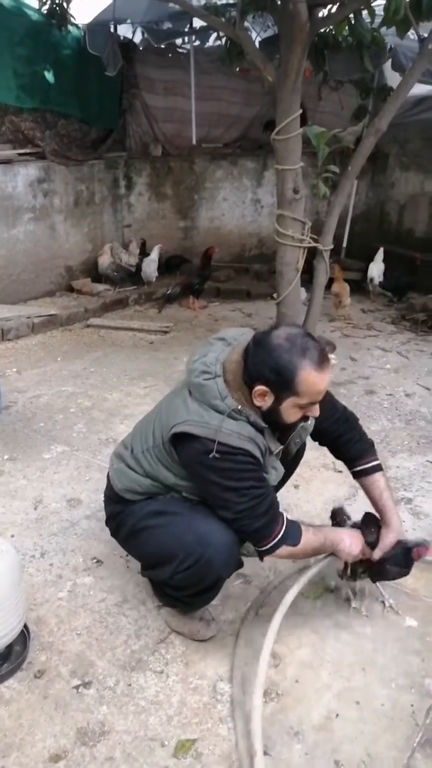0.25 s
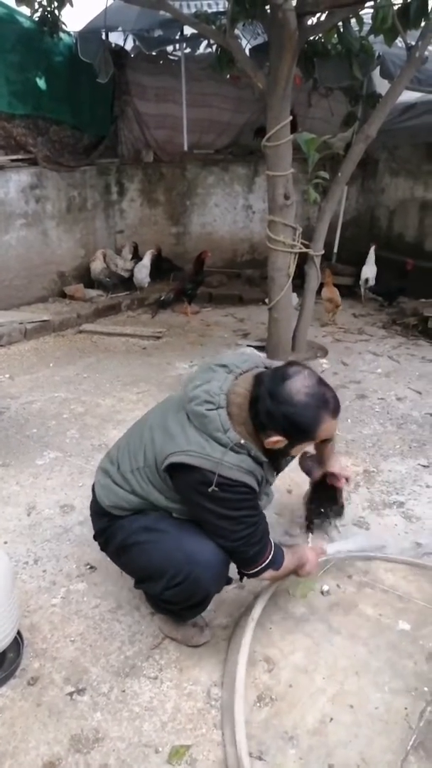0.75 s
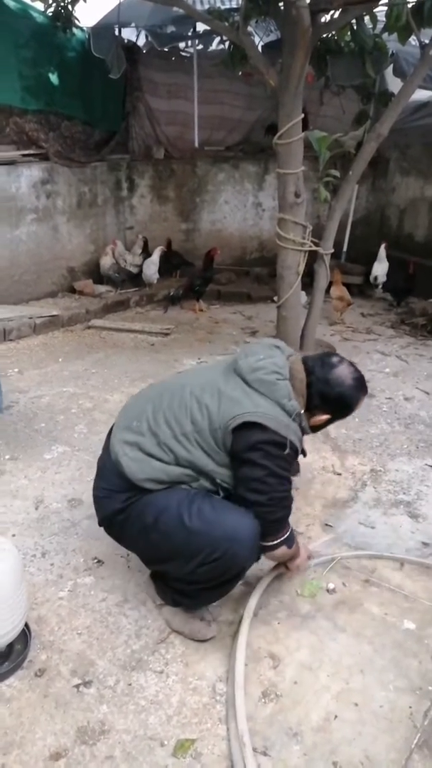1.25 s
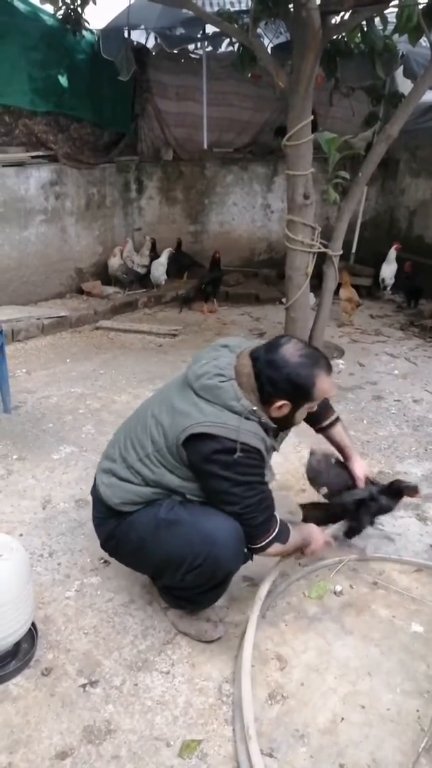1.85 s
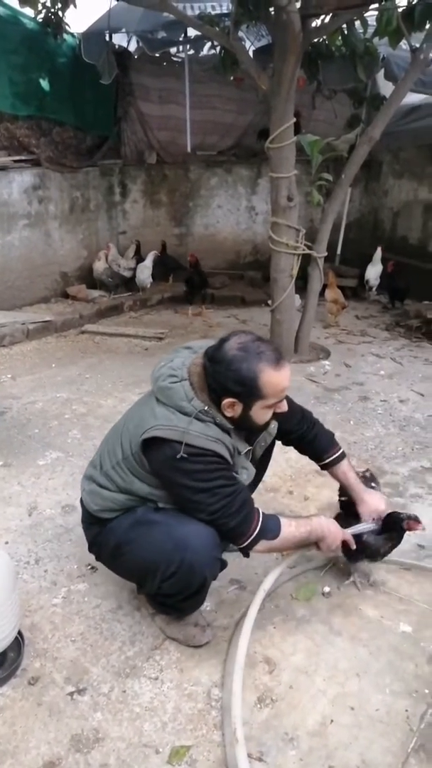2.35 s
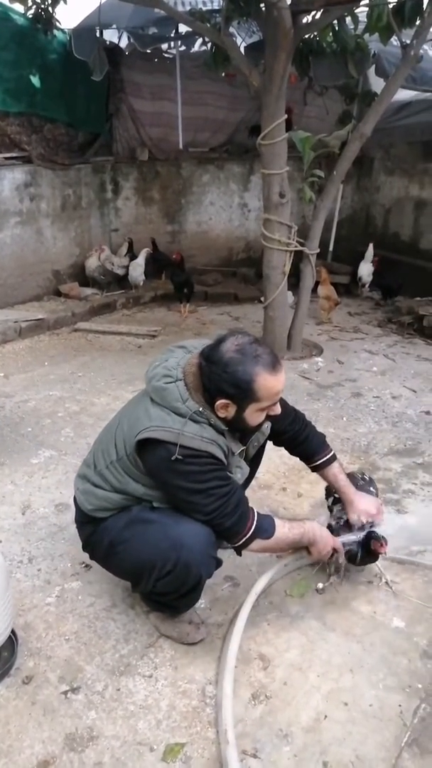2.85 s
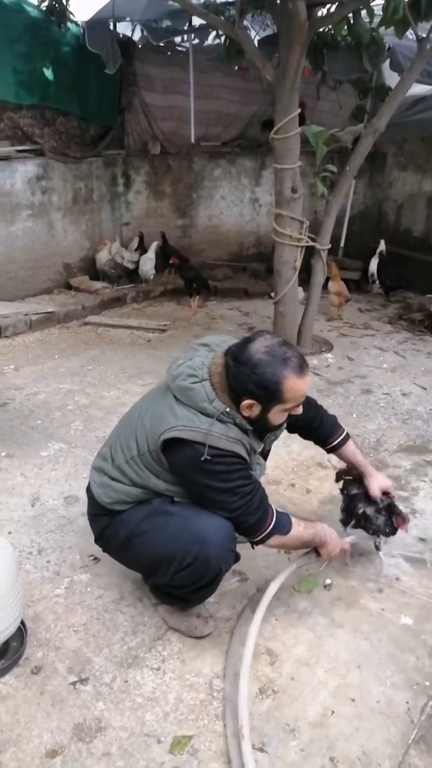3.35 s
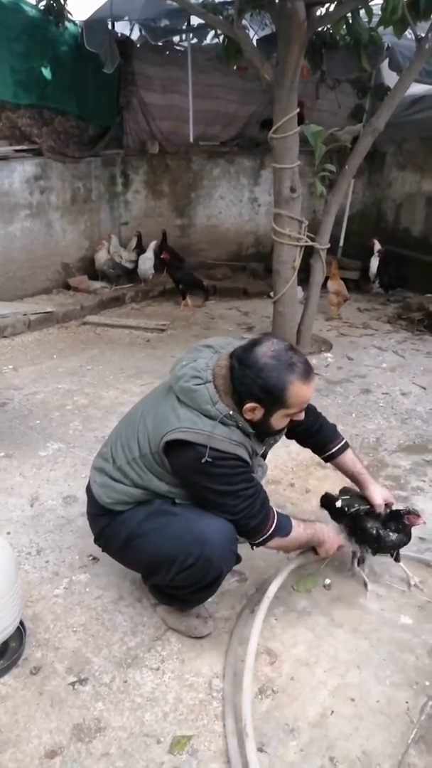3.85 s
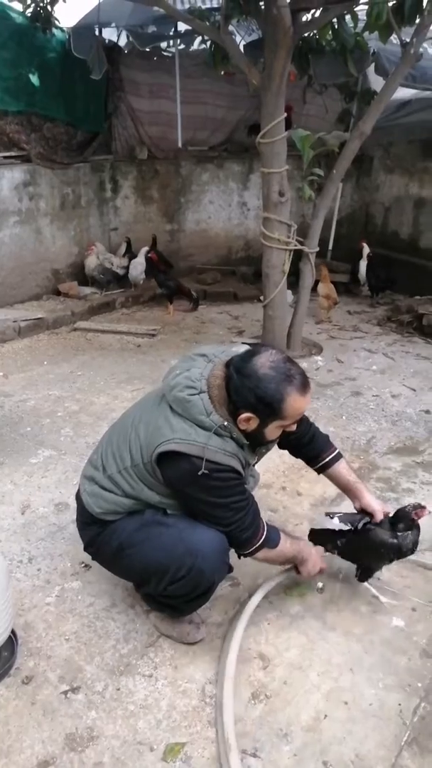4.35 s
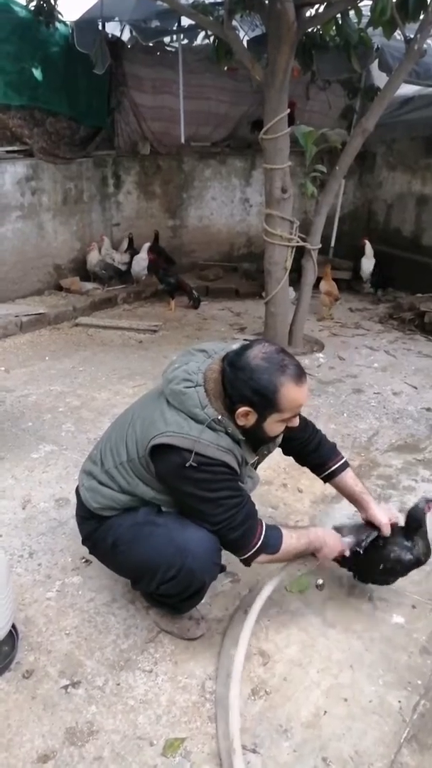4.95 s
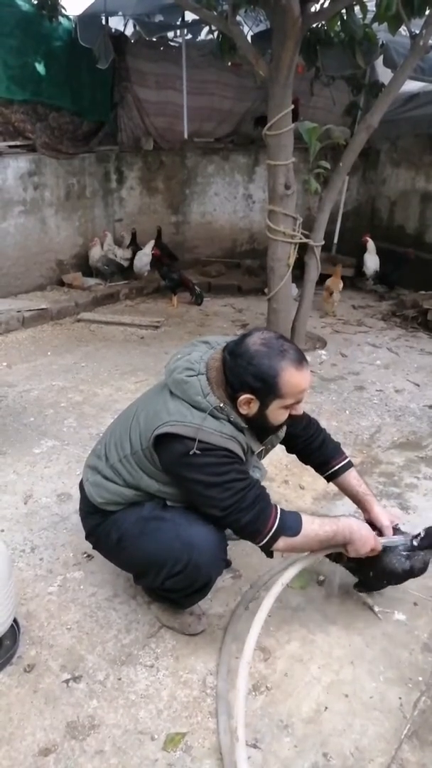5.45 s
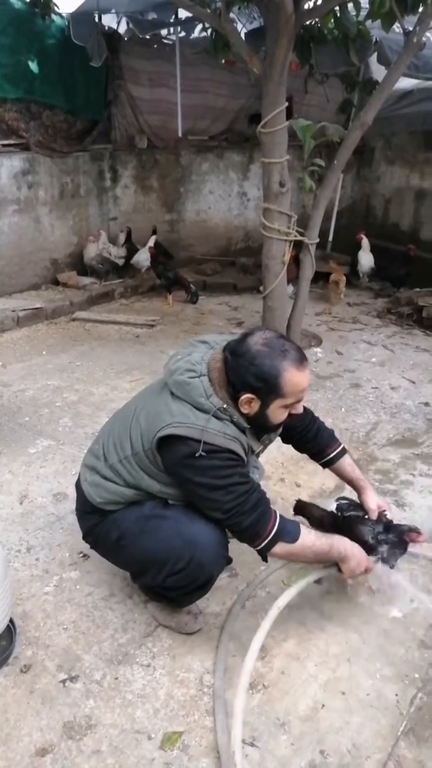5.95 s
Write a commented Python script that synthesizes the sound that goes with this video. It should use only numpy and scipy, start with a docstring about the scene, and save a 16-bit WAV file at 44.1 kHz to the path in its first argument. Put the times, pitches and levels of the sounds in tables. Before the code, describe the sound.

A close stereo pickup of a hen being hosed: quick clucks, then fluttering hoarse squawks, a run of low clucks, a long rising squawk just after three seconds, another after four, then clipped clucks and a final short cry. Water crackles and sprays throughout, with splashy bursts and gaps. A small bird chirps far off and a motor drones very softly in the reverberant yard.

```python
"""A walled concrete yard: close to a stereo microphone, a hen is held and washed with a garden hose.
She protests in short clucks and long, rough, fluttering squawks: pulses and breath through moving resonances.
The jet hisses on her feathers and spatters on the ground: hails of tiny impacts over coloured noise.
A far small bird chirps in warbling sine sweeps, a far motor drones in wavering sines over low rumble."""
import sys
import numpy as np
from scipy import signal
from scipy.fft import rfft, irfft, next_fast_len
from scipy.io import wavfile
from scipy.ndimage import uniform_filter1d

SR = 44100
rng = np.random.default_rng(int(sys.argv[2]) if len(sys.argv) > 2 else 0)


def wrap_up_sound(samples):
    """Save the sound to the file named by the first command line argument, as 16-bit audio."""
    columns = np.atleast_2d(samples).T
    # keep every value between -1 and 1, then stretch to whole-number steps
    tamed = np.clip(columns, -1, 1)
    steps = np.round(tamed * 32767).astype(np.int16)
    wavfile.write(sys.argv[1], SR, steps)


N = 273861
TIME = np.arange(N) / SR

# All levels in the tables are relative: the functions add their own trims.
# Long squawks; rows overlap where the voice splits or changes register. Pitch to chest are values at the climax:
# start_s, climax_s, end_s, level_db, pitch_hz, roughness (0-1), throat_hz, throat_width_hz,
# beak_opening_db, beak_speed_db_per_s, beak_hz, beak_width_hz, chest_db, chest_hz, rasp_db,
# overtone_db (8 kHz, against the rasp), edge_db (3 kHz), beats_per_s, throb_db, pitch_sag_hz_per_s
SQUAWKS = [ (0.619, 0.745, 0.826, -27.5, 688, 0.81, 1490, 1060, -6, 56, 2620, 487, -8, 800, -16.5, -3.5, -23, 48, 5, 290),
           (1.193, 1.315, 1.368, -33.5, 1052, 0.3, 1210, 660, 2.5, 65, 2300, 1080, -12, 730, 0.5, -39, -4, 55, 2.5, 107),
           (1.212, 1.285, 1.35, -38, 703, 0.46, 1700, 900, -1.5, 60, 2630, 600, -10, 690, -2, -32, -11, 49, -1, 98),
           (1.335, 1.363, 1.43, -35, 699.5, 0.95, 1220, 1000, 0.5, 89, 2320, 1290, -2, 686, 2.5, -26, -16, 46, 0.5, 610),
           (1.424, 1.495, 1.605, -35.5, 590, 0.81, 1120, 560, -8, 62, 2335, 500, -8.5, 665, -34, -30, -36, 42.7, 4, 200),
           (2.047, 2.168, 2.203, -33.5, 580, 1.01, 1120, 800, -11, 63, 2570, 800, -9, 630, -17, -26, -15.5, 53.4, 11.5, 310),
           (2.194, 2.229, 2.395, -31.5, 558.8, 0.6, 1100, 497, -17, 90, 2370, 710, -10.5, 684, -15, -18, -19, 49, 7.5, 599.5),
           (3.004, 3.347, 3.385, -29.5, 612.7, .7, 1196, 720, -2.5, 94, 2330, 670, -6.5, 616, -20.5, -0.5, -22, 47.5, 5.5, 100),
           (3.372, 3.409, 3.465, -27.5, 649.3, .85, 1250, 545, -8, 88, 2380, 950, -17, 635, -22.5, -2, -15, 49, 2.5, 306),
           (4.325, 4.479, 4.645, -29.5, 579, 0.7, 1240, 490, -12.5, 32, 2318, 410, -7, 710, -25, -59, -29, 44.8, 4.5, 57),
           (4.779, 4.811, 4.852, -30.5, 683, 0.9, 1290, 700, -8.5, 128, 2150, 750, -6.5, 760, -25, -3, -28, 66, 2, 295),
           (6.083, 6.146, 6.240, -31.5, 685.7, 0.79, 1210, 500, -4.5, 18, 2296, 710, -8, 735, -35, 3, -22, 48.6, 4, 0)]
# Clucks; the pitches are the ends of the straight glide under the arch:
# start_s, length_s, first_pitch_hz, last_pitch_hz, level_db, roughness (0-1), throat_hz,
# beak_opening_db, beak_hz, rasp_db
CLUCKS = [ (0.093, 0.059, 581, 680, -28, 0.07, 1240, -37, 1900, -40),
          (0.114, 0.031, 678, 610, -35, 0.45, 1040, -2, 1990, -30),
          (0.148, 0.022, 648, 470, -32.5, 0.36, 1070, -21, 1900, -30),
          (0.155, 0.026, 770, 720, -38.5, 0.7, 960, -2, 2040, -25),
          (0.176, 0.02, 640, 576, -27.5, 0.41, 1200, -7.5, 2280, -23),
          (0.183, 0.039, 653, 582, -35.5, 0.64, 1070, -17, 1930, -31),
          (0.581, 0.022, 560, 635, -41, 0.45, 1150, -10, 1800, 0.5),
          (0.607, 0.018, 763, 750, -25.5, 0.42, 1620, -22, 2000, -13),
          (0.852, 0.036, 812, 706, -29, 0.49, 1180, -0.5, 2570, -14),
          (0.873, 0.039, 1011, 854, -40.5, 0.44, 950, 12, 1870, -33),
          (1.588, 0.05, 429.7, 482, -29.5, 0.66, 1050, -1, 2370, -11.5),
          (1.653, 0.068, 571, 585, -39, 0.7, 885, -2, 2120, -6),
          (1.705, 0.049, 563, 505.5, -26, 0.6, 1080, -3.5, 2190, -13.5),
          (1.767, 0.12, 601, 566, -44, 0.75, 1010, -7.5, 2190, -25),
          (1.871, 0.058, 494, 555, -24.5, 0.56, 900, -4.5, 2170, -15),
          (2.005, 0.036, 603, 568.4, -28, 0.56, 1130, 2.5, 2310, -6.5),
          (2.329, 0.029, 460.6, 432, -33, 0.48, 1030, -1, 2380, -25),
          (2.815, 0.086, 786, 706, -42.5, 0.57, 680, -16, 1900, -39),
          (2.98, 0.06, 719, 613, -43.5, 0.47, 990, -33, 1900, -28),
          (3.438, 0.02, 675, 624, -28, 0.65, 1300, -24, 2260, -40),
          (3.739, 0.036, 662, 490, -41, 0.4, 586, -13, 2340, -16),
          (4.14, 0.049, 587, 533, -29, 0.19, 1136, -27, 2410, -47),
          (4.168, 0.026, 538, 433, -28, 0.31, 960, -22, 2320, -40),
          (4.242, 0.028, 472, 548, -30, 0.25, 960, -12.5, 1930, -23.5),
          (4.3, 0.028, 512, 543, -30.5, 0.58, 1010, -13, 2400, -25),
          (4.664, 0.035, 579, 555, -31.5, 0.48, 1180, -4, 2120, -37),
          (4.72, 0.031, 641, 765, -37, 0.54, 870, -6, 2100, -30),
          (4.735, 0.033, 690, 621, -30, 0.67, 1190, 0.5, 2350, -32),
          (4.853, 0.026, 673, 594, -26, 0.43, 1013, -4.5, 2050, -16),
          (4.956, 0.02, 550, 620, -35, 0.1, 1150, -22, 2170, -40),
          (4.965, 0.0377, 655.7, 598, -24.5, 0.68, 1160, -12, 2230, -35),
          (4.995, 0.041, 636.4, 514, -30.5, 0.54, 1090, -12.5, 2150, -37),
          (5.033, 0.024, 610, 520, -51, 0.4, 1010, -17, 2100, -21),
          (5.439, 0.045, 542, 561, -26, 0.22, 1080, -29, 2300, -48),
          (5.47, 0.019, 495, 380, -30, .25, 947, -22, 1720, -40),
          (5.489, 0.019, 514, 542, -26.5, 0.47, 1017, -20, 2050, -45),
          (5.925, 0.035, 477, 587, -39.5, 0.37, 1060, -11, 2080, -35),
          (5.934, 0.061, 696, 650, -37, 0.18, 1150, -2, 2420, -31),
          (5.958, 0.039, 687, 498, -31.5, 0.25, 1140, -9.5, 2200, -30),
          (6.059, 0.036, 582, 662, -35, 0.2, 1230, -6, 2330, -25),
          (6.068, 0.027, 587, 406, -35, 0.5, 1000, -9, 2330, -28)]
# Upper resonances of a squawk, in order edge, rasp and overtone: centre_hz, width_hz
UPPER_RESONANCES = [(3300, 470), (5250, 1930), (8100, 1800)]
# Left-right balance of the close sounds, shifting over time: time_s, left_minus_right_db
BALANCE = [(0, -5.5), (1.1, 0), (1.85, -1), (2.05, 5.5), (2.4, 5.5), (3.3, -3.5), (4.7, -4.5), (5.5, -7),
           (6.2, -2.5)]

# Strength of the jet, as the level of its fine spray: time_s, level_db
JET = [(0.0, -58), (0.25, -57), (0.64, -53), (1.42, -67), (1.55, -51), (1.68, -55), (1.97, -70),
       (2.13, -50), (2.39, -61), (3.41, -52.5), (3.56, -49), (3.87, -53), (4.12, -57), (4.62, -63.5),
       (5.21, -54.5), (5.34, -44), (5.38, -65), (5.58, -61), (5.66, -48), (5.88, -56), (6.21, -56)]
# How hard water spatters on the ground as the hen is moved through the jet: time_s, level_db
SPATTERING = [(0, -37.5), (0.25, -39), (0.31, -41), (0.55, -40.5), (1.03, -43.5), (1.5, -43.5),
              (1.83, -48.5), (2.15, -43.5), (2.4, -47.5), (2.47, -42.5), (2.95, -42.5), (3.6, -40.5),
              (3.85, -43.5), (3.98, -39), (4.15, -49), (4.32, -42.5), (4.65, -48), (4.95, -46.5),
              (5.2, -42), (5.34, -41), (5.4, -52.5), (5.66, -40.5), (5.85, -45), (6.21, -45.5)]
# The jet slaps on feathers or concrete: start_s, length_s, spatter_db, fine_spray_db
SLAPS = [(0.126, 0.12, -33, -47), (0.415, 0.13, -36, -86), (1.063, 0.17, -35.5, -52.5),
         (1.984, 0.08, -35.5, -51), (2.424, 0.02, -36.5, -72), (2.516, 0.15, -37, -49),
         (2.714, 0.19, -41, -85), (4.698, 0.097, -41, -50), (5.239, 0.1, -37, -58),
         (5.696, 0.088, -40, -43.5), (5.917, 0.2, -33.5, -44.5)]
# Colour of the spatter on the ground: frequency_hz, gain_db
SPATTER_COLOUR = [(700, -55), (1300, -26), (2300, -4.5), (3000, -6), (4200, -11.5), (5300, 4.5), (6100, 4),
                  (7700, -7.5), (10500, -26), (14000, -15)]
# Colour of the fine spray: frequency_hz, gain_db
SPRAY_COLOUR = [(7000, -4), (9500, 8.5), (11000, 3), (12500, 6.5), (13800, -20), (15000, 13), (16000, -44)]
# Watery gushes, hoarse rasps of the hen, a low thud: start_s, length_s, centre_hz, width_hz, level_db
NOISE_SWELLS = [(0.595, 0.031, 5370, 600, -36), (0.954, 0.041, 265, 200, -50.5),
                (1.016, 0.53, 1770, 1430, -39), (2.498, 0.087, 1520, 830, -43),
                (3.943, 0.36, 660, 440, -48.5), (4.073, 0.016, 472, 204, -40),
                (4.405, 0.18, 4250, 888, -54.5), (4.803, 0.078, 4500, 1510, -42.5),
                (5.289, 0.066, 3850, 2470, -48.5), (5.62, 0.058, 2140, 503, -52),
                (6.013, 0.027, 2520, 800, -40.5)]
# Sharp ticks, most like drops on concrete: start_s, peak_db
TICKS = [(0.1605, -36), (0.9475, -25.5), (2.4319, -36), (2.623, -33), (3.647, -38), (5.079, -42),
         (5.268, -34), (5.428, -38), (5.671, -34), (5.838, -42)]

# Chirps and thin whistles of a far small bird: start_s, length_s, first_hz, last_hz, level_db
CHIRPS = [(0.038, 0.036, 3220, 3440, -39.5), (0.047, 0.064, 4240, 5300, -35),
          (2.798, 0.05, 2770, 3680, -43), (2.817, 0.066, 4060, 4800, -44.5),
          (4.18, 0.14, 2470, 2536, -48.5), (4.777, 0.025, 2940, 3840, -39.5),
          (4.785, 0.051, 5280, 5010, -35)]
# Far motor on its higher note: time_s, pitch_hz, level_db
HIGH_HUM = [(0.0, 131.2, -54), (0.29, 149.7, -51), (0.901, 153.6, -55.5), (1.01, 130, -51.5),
            (1.99, 134.8, -45), (2.3, 126.5, -61)]
# Far motor later, on its lower note: time_s, pitch_hz, level_db
LOW_HUM = [(3.7, 100, -75), (3.92, 103, -50), (4.278, 97.7, -43.5), (4.36, 100.3, -55), (5.9, 99.4, -50.5),
           (6.21, 103.5, -60)]
# Colour of the outdoor rumble: frequency_hz, gain_db
RUMBLE_COLOUR = [(20, -12), (45, -2), (90, -0.5), (155, 0), (220, -7.5), (400, -7), (700, -10),
                 (1500, -16.5), (3000, -25)]
# Left-right likeness of diffuse sound: frequency_hz, likeness (0-1)
LIKENESS = [(60, 1), (240, 0.99), (480, 0.81), (950, 0.42), (1900, 0.007), (15000, 0.017)]
# Balance of the two microphone ports: frequency_hz, left_minus_right_db
PORTS = [(100, -2), (700, -2), (1300, 0), (2300, -8.5), (3300, -8), (4400, -4.5), (5600, -18.5), (7000, -8),
         (8500, 0), (10500, -3.5), (12500, -11.5), (15000, -16)]

# Squawks: change on either side of the climax
SWELL_DB_PER_S, EBB_DB_PER_S = 13.5, 23
RASP_RISE_DB_PER_S, RASP_FALL_DB_PER_S = 77, 124
RISE_HZ_PER_S = 120
ROUGH_LOSS_PER_S = 0.24   # the voice is clearer away from the climax
SQUAWK_ATTACK_S, SQUAWK_RELEASE_S = 0.0058, 0.0091
FLUTTER = .12   # share by which the pitch swings with each beat, at full roughness
AIRWAY_FLEX = .08   # share by which the resonances swing with each beat, at full roughness
# Clucks
CLUCK_BEATS_PER_S = 165   # a rattle
THROB_DB = 5.5   # swing of the level with each beat, at full roughness
VOICE_LOW_HZ = 400   # the hen's body radiates little below this
SLAP_PEAK_SHARE = 0.47   # a slap is loudest at this share of its length, then drains away
RUMBLE_DB = -50.5
YARD_T60_S, RIGHT_LEAD_S = 0.35, 0.00015
CUTOFF_HZ = 15850


def hen():
    """Squawks and clucks, rolled off in the bass because a small body radiates little there."""
    high_pass = signal.butter(4, VOICE_LOW_HZ, "high", fs=SR, output="sos")
    return signal.sosfilt(high_pass, squawks() + clucks() + 1e-18)


def squawks(body_db=-3.04, throat_db=-5.5, beak_db=6, chest_width_hz=380, leak_db=-13, hoarse_db=-20,
            closed_ratio=0.85, half_open_db=-9):
    """Long rough cries; towards the climax the beak opens, so that its resonance grows and climbs."""
    out = np.zeros(N)
    for (start, climax, end, level_db, pitch_hz, rough, throat_hz, throat_width, open_db, beak_speed,
         beak_hz, beak_width, chest_db, chest_hz, rasp_db, overtone_db, edge_db, beats_per_s, throb_db,
         sag_hz_per_s) in SQUAWKS:
        t = np.arange(start, end, 1 / SR)
        before, after = np.maximum(climax - t, 0), np.maximum(t - climax, 0)
        level = level_db - SWELL_DB_PER_S * before - EBB_DB_PER_S * after
        opening = open_db - beak_speed * (before + after)
        strain = -RASP_RISE_DB_PER_S * before - RASP_FALL_DB_PER_S * after
        pitch = pitch_hz - RISE_HZ_PER_S * before - sag_hz_per_s * after
        roughness = np.clip(rough - ROUGH_LOSS_PER_S * (before + after), 0, 1)

        swell, glide = flutter(t - climax, beats_per_s)
        breath = .45 - .25 * np.tanh(swell)   # clearest at the top of a beat
        source = syrinx(pitch, roughness, glide, air=breath)

        flex = 1 + AIRWAY_FLEX * roughness * glide   # the airway moves with every beat
        bend = flex * pitch / pitch_hz
        # the chest carries the fundamental
        chest = resonance(source, chest_hz * bend, chest_width_hz, 1.35 * roughness)
        throat = resonance(source, throat_hz * bend, throat_width, roughness / 2)
        edge, rasp, overtone = [resonance(source, hz, width, roughness) for hz, width in UPPER_RESONANCES]
        wide = 1 / (1 + from_db(2 * (half_open_db - opening)))   # 0 closed, 1 wide open
        beak_centre = beak_hz * flex * (closed_ratio + (1 - closed_ratio) * wide)
        beak = resonance(source, beak_centre, beak_width, roughness / 2)
        # turbulence between the resonances
        turbulence = roughness * resonance(rng.standard_normal(len(t)), 1930, 2270, roughness)

        cry = from_db(throat_db) * throat + from_db(opening + beak_db) * beak
        raspy = from_db(rasp_db) * (rasp + from_db(overtone_db) * overtone)
        cry += from_db(strain) * (from_db(edge_db) * edge + raspy)
        cry = cry * from_db(throb_db * np.tanh(swell))
        cry += from_db(chest_db + body_db) * chest
        cry += (from_db(hoarse_db) + from_db(opening + beak_db + leak_db)) * turbulence
        envelope = gate(t, start, end, SQUAWK_ATTACK_S, SQUAWK_RELEASE_S)
        add(out, start, cry * from_db(level) * envelope)
    return out


def clucks(throat_width_hz=560, beak_width_hz=850, gain_db=0.22, leak_db=-13, chest_db=-7,
           airway_follows=0.24):
    """Short arched notes that swell and fade smoothly; throat and beak resonances bend with the pitch."""
    out = np.zeros(N)
    for (start, length, first_hz, last_hz, level_db, rough, throat_hz,
         opening_db, beak_hz, rasp_db) in CLUCKS:
        size, rough = int(length * SR), np.clip(rough, 0, 1)
        # air pressure lifts loudness and pitch together
        swell = np.sin(np.pi * np.linspace(0, 1, size) ** .9)
        pitch = np.linspace(first_hz, last_hz, size) * (1 + .11 * (swell - swell.mean()))
        bend = (pitch / pitch.mean()) ** airway_follows
        beat = beats(CLUCK_BEATS_PER_S, size)
        source = syrinx(pitch, rough * (1 + swell) / 2, beat, air=.4)

        # a clean note has a narrow throat
        note = resonance(source, throat_hz * bend, throat_width_hz * (0.28 + 2 * rough))
        note += from_db(chest_db + 0.77 * opening_db) * resonance(source, pitch, 290)
        beak = resonance(source, beak_hz * bend, beak_width_hz)
        leak = from_db(leak_db) * resonance(source, 3010, 1810)
        note += swell * from_db(opening_db + 1.5) * (beak + leak)
        note += swell * from_db(rasp_db - 2.5) * resonance(source, 5700 * bend, 2700)
        throb = THROB_DB * rough * np.tanh(beat)
        add(out, start, from_db(level_db + gain_db + throb) * note * swell ** 1.4)
    return out


def syrinx(pitch, rough, beat, air=1.0):
    """Membrane pulses swing in pitch with the beat; roughness adds wander, period doubling and air puffs."""
    size = len(pitch)
    unsteady = FLUTTER * beat + .04 * drift(30, size) + .045 * drift(244, size)
    phase = 2 * np.pi * np.cumsum(pitch * (1 + rough * unsteady)) / SR
    # the k * k term smears each pulse over its cycle
    pulses = sum(np.cos(k * phase + k * k / 5) for k in range(1, 14))
    doubling = 1 + .6 * rough * drift(25, size) * np.cos(phase / 2)
    pulses = pulses * doubling * from_db(3 * rough * drift(200, size))
    puffs = rough * (1 + np.cos(phase) / 2) * rng.standard_normal(size)
    return rms_one(pulses) + air * puffs


def flutter(since_climax, per_s, uneven_rad=.35, uneven=.3):
    """Slow flapping of the syrinx: uneven swells, the pitch falling through each; the climax is one of them."""
    size = len(since_climax)
    phase = 2 * np.pi * per_s * since_climax + uneven_rad * drift(per_s / 4, size)
    swell = np.cos(phase) * (1 + uneven * drift(per_s / 2, size))
    glide = -np.sin(phase) + .3 * np.sin(2 * phase)
    return swell, glide * (1 + uneven * drift(per_s / 2, size))


def beats(per_s, size, unevenness=.26):
    """Fast uneven flapping of the syrinx, about -1 to 1, its strength and rate drifting."""
    phase = 2 * np.pi * np.cumsum(per_s * (1 + unevenness * drift(per_s / 2, size))) / SR
    return np.sin(phase) * (1 + .25 * drift(per_s / 2, size)) + .25 * np.sin(phase / 2)


def resonance(source, hz, width, rough=0):
    """One steep airway resonance, whose centre may move; even in level unless roughness makes it flicker."""
    # shift the centre down to zero, low-pass twice, shift back up
    turn = np.exp(2j * np.pi * np.cumsum(hz * np.ones(len(source))) / SR)
    low = signal.butter(2, width / 2, fs=SR, output="sos")
    x = np.real(signal.sosfilt(low, signal.sosfilt(low, source / turn)) * turn)
    x = x / np.sqrt(np.abs(uniform_filter1d(x ** 2, size=600)) + 1e-12)
    return x * from_db(4.5 * rough * np.tanh(drift(45, len(x))) - rough)


def hose(spray_gain_db=-3.5):
    """The jet spatters on the ground and breaks into fine spray; both flare when it slaps on something."""
    spatter_gain = from_db(along(SPATTERING, TIME)[0])
    spray_gain = from_db(along(JET, TIME)[0] + spray_gain_db)
    for start, length, spatter_db, spray_db in SLAPS:
        age = np.maximum(TIME - start, 0) / (SLAP_PEAK_SHARE * length)
        flare = (age * np.exp(1 - age)) ** 2
        spatter_gain = np.hypot(spatter_gain, from_db(spatter_db) * flare)
        spray_gain = np.hypot(spray_gain, from_db(spray_db) * flare)
    spatter = droplets(SPATTER_COLOUR, per_s=3000, spread_db=4.0, hiss=.7,
                       flicker_db=.8, patchy_db=1.8, lone_db=13.5)
    spray = droplets(SPRAY_COLOUR, per_s=3000, spread_db=3.3, hiss=.6,
                     flicker_db=.9, patchy_db=1.0, lone_db=12)
    return spatter_gain * spatter + spray_gain * spray


def droplets(spectrum, per_s, spread_db, hiss, flicker_db, patchy_db, lone_db, lone_per_s=35):
    """Clumped tiny impacts and a few lone bigger ones on smooth hiss; each frequency range flickers alone."""
    born = rng.random(N) < per_s / SR * from_db(5 * drift(60, N))
    sizes = from_db(spread_db * np.minimum(rng.exponential(1, N), 3.5))
    lone = from_db(lone_db) * sizes * (rng.random(N) < lone_per_s / SR)
    hail = rms_one(sizes * born * rng.uniform(-0.59, 1, (2, N)))
    impacts = hail + lone + hiss * rng.standard_normal((2, N))
    ranges_hz = [2300, 4200, 5600, 9000]
    patchy = np.zeros((2, N))
    for share in np.eye(len(ranges_hz)):
        part = filtered(impacts, lambda hz: np.interp(hz, ranges_hz, share))
        patchy += part * from_db(patchy_db * drift(35, N))
    return rms_one(diffuse(patchy, spectrum)) * from_db(flicker_db * drift(14.0, N))


def swells_and_ticks(tick_decay_s=0.0017):
    """Short swells of band noise (watery gushes, hoarse rasps, a low thud) and fast-decaying noise ticks."""
    out = np.zeros(N)
    for start, length, hz, width, level_db in NOISE_SWELLS:
        size = int(length * SR)
        noise = rms_one(band(rng.standard_normal(size), hz, width))
        add(out, start, from_db(level_db) * noise * signal.windows.tukey(size, .7))
    for start, peak_db in TICKS:
        burst = rng.standard_normal(1000) * np.exp(-TIME[:1000] / tick_decay_s)
        tick = band(burst, 7600, 11800)
        add(out, start, from_db(peak_db) * tick / np.abs(tick).max())
    return out


def yard_echoes(x, early_db=-6, late_db=-11, early_t60_s=0.14):
    """Sparse reflections from ground and near walls, then a denser tail."""
    t = TIME[:SR]
    sparse = rng.standard_normal((2, SR)) * (rng.random(SR) < 900 / SR)
    early = sparse * from_db(-60 * t / early_t60_s) * (t > .005)
    late = rng.standard_normal((2, SR)) * from_db(-60 * t / YARD_T60_S) * (t > .02)
    response = (from_db(early_db) * rms_one(early) + from_db(late_db) * rms_one(late)) / np.sqrt(2 * SR)
    echoes = signal.fftconvolve(x[None], response, axes=1)[:, :N]
    # colour of the echoes: frequency_hz, gain_db
    return diffuse(echoes, [(400, 3.6), (700, 12.8), (1100, 5.1), (2400, 3.5), (5500, 8.1), (12000, 5.1)])


def chirps(warble=0.045):
    """Sine sweeps with a quick warble, coarser the wider they sweep; a held whistle is nearly pure."""
    out = np.zeros(N)
    for start, length, first_hz, last_hz, level_db in CHIRPS:
        size = int(length * SR)
        depth = warble * np.sqrt(abs(last_hz / first_hz - 1) / .2)
        hz = np.linspace(first_hz, last_hz, size) * (1 + depth * drift(310, size))
        tone = np.sin(2 * np.pi * np.cumsum(hz) / SR)
        add(out, start, from_db(level_db) * tone * signal.windows.tukey(size, .6))
    return out


def background(waver=0.018, motor_db=-0.7, fade_s=0.025):
    """Outdoor rumble as coloured noise, and a far motor as sines that waver in pitch and level."""
    out = from_db(RUMBLE_DB) * rms_one(diffuse(rng.standard_normal((2, N)), RUMBLE_COLOUR))
    for hum in HIGH_HUM, LOW_HUM:
        hz, level_db = along(hum, TIME)
        phase = 2 * np.pi * np.cumsum(hz * (1 + waver * drift(24.0, N))) / SR
        drone = rms_one(np.sin(phase)) * gate(TIME, hum[0][0], hum[-1][0], fade_s, fade_s)
        out = out + from_db(level_db + motor_db + 2 * drift(36.0, N)) * drone
    return out


def diffuse(pair, spectrum):
    """Two unrelated signals become a coloured stereo field, alike in the bass."""
    def alike(hz):
        return np.clip(at_hz(LIKENESS, hz), -1, 1)
    mid = filtered(pair[0], lambda hz: from_db(at_hz(spectrum, hz)) * np.sqrt(1 + alike(hz)))
    side = filtered(pair[1], lambda hz: from_db(at_hz(spectrum, hz)) * np.sqrt(1 - alike(hz)))
    return np.array([mid + side, mid - side])


def filtered(x, gain_at):
    """Apply a smooth gain, given as a function of frequency."""
    size = next_fast_len(N + 4096)
    hz = np.arange(size // 2 + 1) * SR / size
    return irfft(rfft(x, size) * gain_at(hz), size)[..., :N]


def band(x, hz, width):
    """A band-pass with steep skirts, centred on hz."""
    low = np.hypot(hz, width / 2) - width / 2
    high = min(low + width, SR / 2.1)
    return signal.sosfilt(signal.butter(2, [low, high], "band", fs=SR, output="sos"), x + 1e-18)


def drift(rate, size):
    """Slow random wander of about unit spread, faster for a higher rate."""
    r = np.exp(-16 * np.pi * rate / SR)
    # made at an eighth of the sample rate; the first 4000 values let the filter settle
    slow = signal.lfilter([1], [1, -2 * r, r * r], rng.standard_normal(size // 8 + 4002))[4000:]
    return np.interp(np.arange(size) / 8, np.arange(len(slow)), rms_one(slow))


def gate(t, start, end, attack_s, release_s):
    """Attack, hold and release between two times."""
    return np.clip((t - start) / attack_s, 0, 1) * np.clip((end - t) / release_s, 0, 1)


def from_db(db):
    """Decibels to an amplitude factor."""
    return 10 ** (np.asarray(db) / 20)


def rms_one(x):
    """Scale to an rms of 1."""
    return x / np.sqrt(np.mean(x ** 2) + 1e-20)


def along(rows, t):
    """Columns of a curve at the times t."""
    s, *columns = np.transpose(rows)
    return [np.interp(t, s, c) for c in columns]


def at_hz(points, hz):
    """A curve read on a logarithmic frequency axis."""
    point_hz, value = np.transpose(points)
    return np.interp(np.log(hz + 1), np.log(point_hz), value)


def add(out, s, x):
    """Mix x into out from time s on."""
    i = max(int(s * SR), 0)
    out[i:i + len(x)] += x[:max(N - i, 0)]


def scene(direct_db=2.5, bird_echo_db=5):
    """The hen is close and mostly a little to the right; the bird is far off and mostly echo."""
    near, bird = hen() + swells_and_ticks(), chirps()
    balance_db, = along(BALANCE, TIME)
    left = np.interp(TIME - RIGHT_LEAD_S, TIME, near)
    direct = np.array([left, near]) * from_db([balance_db / 2, -balance_db / 2])
    echoes = yard_echoes(near + from_db(bird_echo_db) * bird)
    return from_db(direct_db) * direct + bird + echoes + hose() + background()


def record(dry):
    """The right microphone port resonates in the treble, the left is duller; the top is cut."""
    def port_gains(hz):
        ratio = from_db(at_hz(PORTS, hz))
        return np.array([ratio, np.ones_like(ratio)]) * np.sqrt(2 / (1 + ratio ** 2))
    top_cut = signal.ellip(10, .2, 80, CUTOFF_HZ, fs=SR, output="sos")
    return signal.sosfilt(top_cut, filtered(dry, port_gains))


dry = scene()
out = record(dry)
wrap_up_sound(out)
```